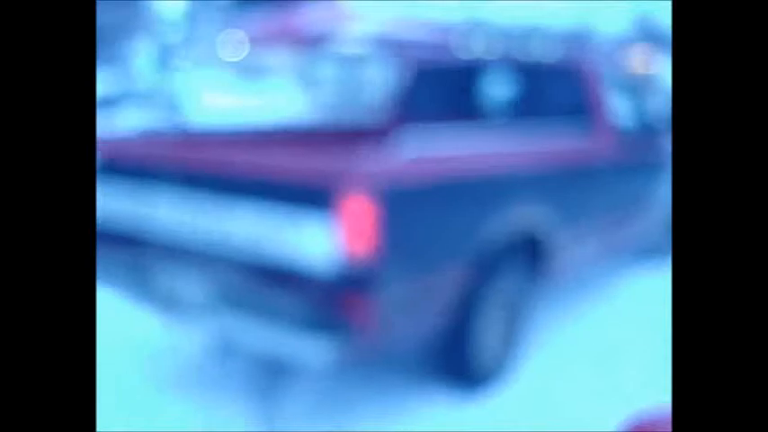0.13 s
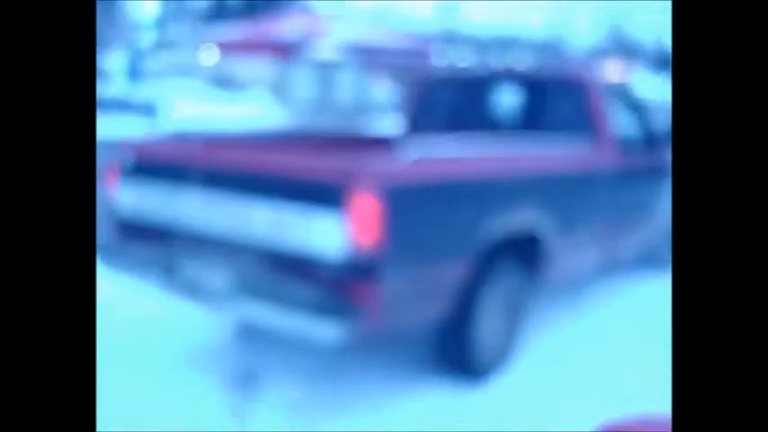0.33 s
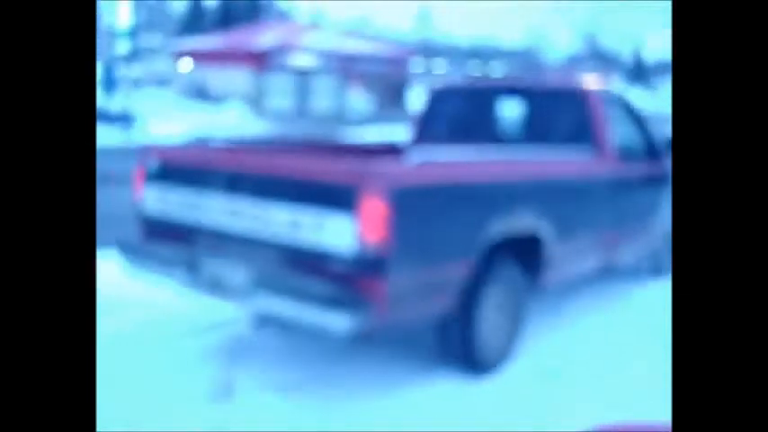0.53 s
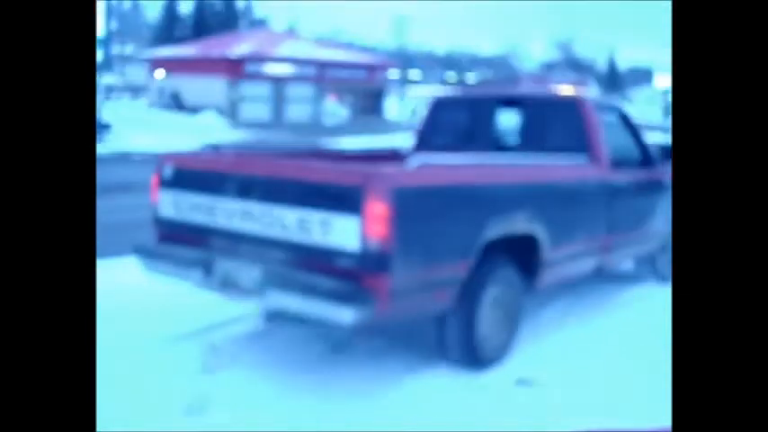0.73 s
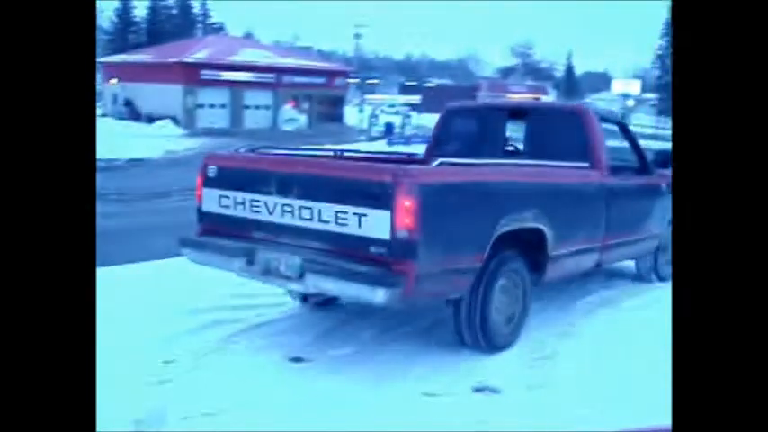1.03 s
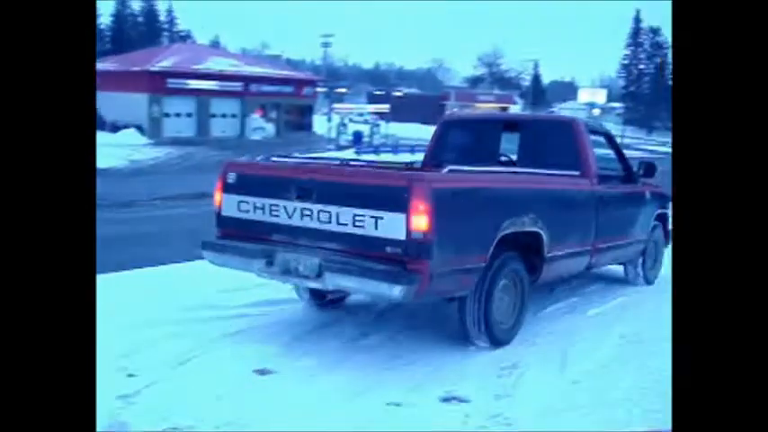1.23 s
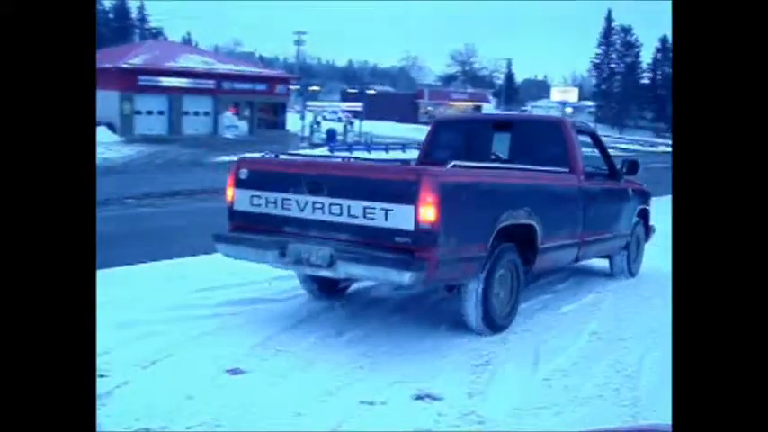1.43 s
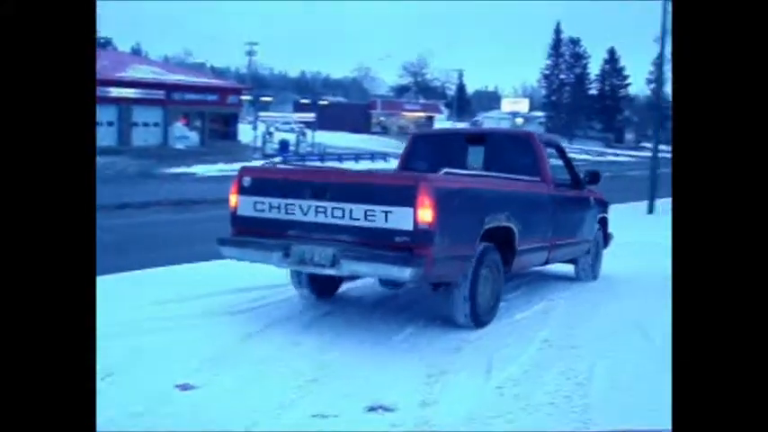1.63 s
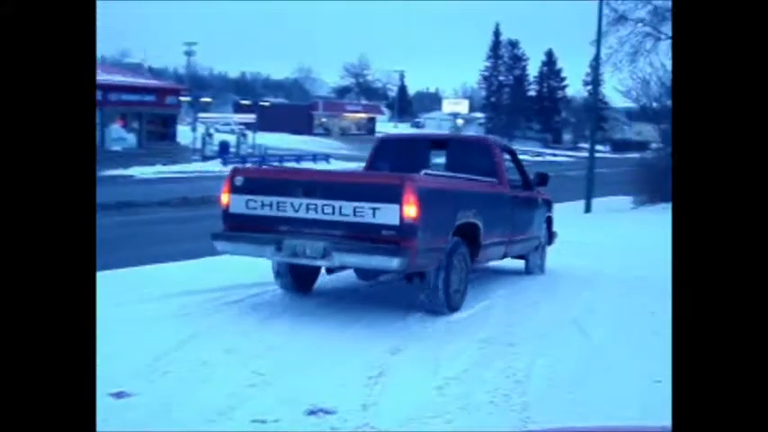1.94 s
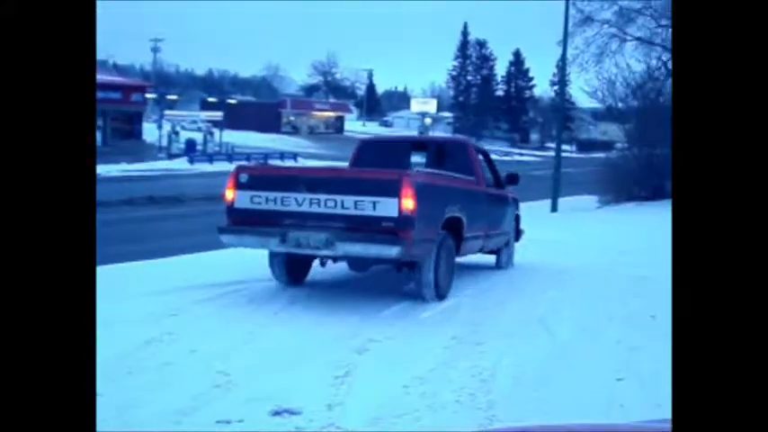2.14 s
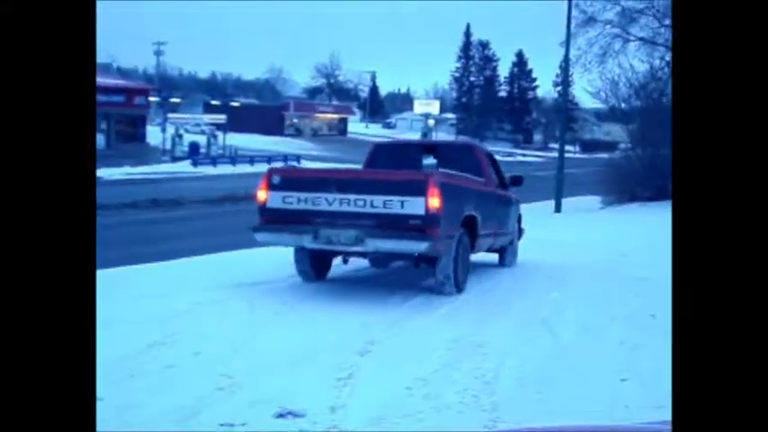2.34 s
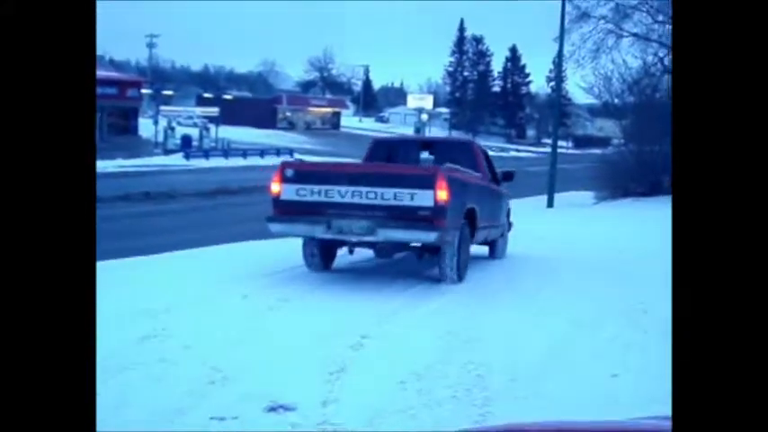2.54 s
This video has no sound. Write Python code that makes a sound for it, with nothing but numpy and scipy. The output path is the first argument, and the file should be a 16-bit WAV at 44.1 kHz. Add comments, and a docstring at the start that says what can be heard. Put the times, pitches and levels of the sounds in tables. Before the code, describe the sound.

A pickup truck's loud exhaust crackles through one sharp rev close by, popping as the engine slows. The truck then pulls away outdoors with a pulsing rumble, hollow knocks and one backfire that briefly overloads the microphone.

```python
"""A crackling blip of a pickup's V8 bursts close by from an open exhaust; the pipes pop as the revs
fall, then the truck pulls away with knocks, a brief metallic ring, rips and one backfire. Each firing
is a pressure pulse that leaves the pipe as a low resonant thump, a hollow bark and a rasp of turbulent
gas. The eight cylinders are unequal, so the sound lopes. The hardest peaks overload the microphone."""
import sys
import numpy as np
from scipy import signal
from scipy.fft import rfft, irfft, next_fast_len
from scipy.io import wavfile
from scipy.ndimage import map_coordinates

SR = 44100
rng = np.random.default_rng(int(sys.argv[2]) if len(sys.argv) > 2 else 0)


def digitize_waveform(pressure):
    """Quantize a signal to 16-bit integers and store it at the path in sys.argv[1].

    Rows of a 2-D input are taken as channels; values are limited to [-1, 1].
    """
    field = np.atleast_2d(pressure).T
    bounded = np.clip(field, -1, 1)
    quanta = np.round(bounded * 32767).astype(np.int16)
    wavfile.write(sys.argv[1], SR, quanta)


N = 119070

# firing rate of the engine: t/s, f/Hz
FIRING_RATE = [(0, 88), (0.2, 103.1), (0.32, 112), (0.44, 103), (0.56, 84), (0.68, 60.8), (0.86, 58.7),
               (1.08, 52.4), (1.3, 47.5), (1.42, 49.3), (1.56, 56.1), (1.8, 60.3), (2.25, 59), (2.7, 56.7)]
# engine load, as relative levels: t/s, bark level/dB, rasp level/dB
ENGINE_LOAD = [(.33, -26.5, -44), (.5, -25.5, -44.5), (.64, -23.5, -44), (.77, -28, -40), (.87, -27, -42),
               (1.0, -30, -51.5), (1.15, -29.5, -41.5), (1.36, -24.5, -34.5), (1.46, -21.5, -29),
               (1.58, -19, -26.5), (1.9, -19.5, -31), (1.98, -25.5, -35), (2.3, -24, -38.5),
               (2.69, -26, -41.5)]
# spectrum of the rushing gas: f/Hz, level/dB
RASP_SPECTRUM = [(700, -34), (1500, -9.5), (2000, -3), (2400, 5.5), (2820, -4.5), (3100, 1), (4400, -3),
                 (5000, -13), (5700, -10), (6800, -13.5), (7600, -19.5), (9000, -26.5), (10200, -38.5)]


def amp(db):
    """Amplitude ratio of a level in decibels."""
    return 10 ** (np.asarray(db) / 20)


def unit(x):
    """Normalisation to rms 1."""
    return x / np.sqrt(np.mean(x ** 2) + 1e-20)


def curve(rows, column=1):
    """Linear interpolation of one column of a timed table, per sample."""
    rows = np.array(rows)
    return np.interp(np.arange(N) / SR, rows[:, 0], rows[:, column])


def coloured(x, spectrum):
    """Minimum-phase filtering: a causal response with the given magnitude (f/Hz, level/dB)."""
    size = 8192
    hz, db = np.transpose(spectrum)
    gain = amp(np.interp(np.log(np.fft.rfftfreq(size, 1 / SR) + 1), np.log(hz), db))
    cepstrum = irfft(np.log(gain))
    cepstrum[1:size // 2] *= 2
    cepstrum[size // 2 + 1:] = 0
    return signal.fftconvolve(x, irfft(np.exp(rfft(cepstrum))))[:N]


def shaped(x, spectrum):
    """Zero-phase filtering: a weighting (f/Hz, level/dB) without delay."""
    hz, db = np.transpose(spectrum)
    f = np.fft.rfftfreq(2 * N, 1 / SR)
    return irfft(rfft(x, 2 * N) * amp(np.interp(np.log(f + 1), np.log(hz), db)))[:N]


def pulses(times, db=0, scatter_db=1.6):
    """Impulse train with normally scattered levels."""
    size = amp(db + scatter_db * rng.standard_normal(len(times)))
    return np.bincount(np.clip(times * SR, 0, N).astype(int), size, N + 1)[:N]


def puffs(spikes, width_s, steady=0):
    """Pulsed turbulence: noise swells and fades around each spike, over a steady flow."""
    half = SR // 50
    shape = 1 / np.cosh(np.arange(-half, half + 1) / SR / width_s)
    flow = signal.fftconvolve(spikes, shape, "same") + steady
    return unit(flow * rng.standard_normal(N))


def exhaust():
    """Periodic excitation: unequal cylinders fire in turn, so the pattern repeats every eight pulses."""
    # in firing order: bank, thump lag/firing intervals, then relative level/dB of thump, bark, rasp
    cylinders = [(0, -0.04, 4.6, 0.5, 9.5), (1, -0.12, 9, -5, 9.5), (0, 0.1, 7, -3.5, 3.5),
                 (1, -0.12, 11, -2.5, 13.5), (1, -0.067, 8.5, 0, 10), (0, 0.016, 9.5, -0.5, 5),
                 (1, -.14, 7.5, -4.5, 5.5), (0, 0.052, 10, -6.5, 4.5)]
    cycles = np.cumsum(curve(FIRING_RATE)) / SR
    firing = np.arange(int(cycles[-1]) + 1)
    jitter_s = 0.00025 * rng.standard_normal(len(firing))
    times = np.interp(firing, cycles, np.arange(N) / SR) + jitter_s
    bank, lag, thump_db, bark_db, rasp_db = np.array(cylinders)[firing % len(cylinders)].T
    thump_times = times + lag * np.gradient(times)
    return thump(thump_times, bank, thump_db) + bark(times, bark_db) + rasp(times, rasp_db) + crackle(times)


def tailpipe(x, modes):
    """Modal superposition: a pipe responds as a sum of damped resonators."""
    size = next_fast_len(N + SR // 2)
    f = np.fft.rfftfreq(size, 1 / SR)
    response = sum(sign * amp(db) * 1j * f * width / (hz * hz - f * f + 1j * f * width)
                   for hz, width, db, sign in modes)
    return irfft(rfft(x, size) * response, size)[:N]


def thump(times, bank, db):
    """Forced resonance: each bank rings its own tailpipe, heard in a deep, an upper and a throb band."""
    # modes of each pipe: f/Hz, bandwidth/Hz, level/dB, polarity
    pipe_modes = [
        [(67, 21, -12, 1), (129, 50, -16, 1), (173, 37, -1, 1), (183, 46, -1, -1), (266, 40, -15, -1)],
        [(88, 46, -10, 1), (177, 39, 0, -1), (191, 49, 0, 1), (221, 23, -2, -1), (296, 22, -15, 1)],
    ]
    # spectra of the three bands: f/Hz, level/dB
    deep_spectrum = [(25, -41.5), (42, -10), (56, 8.5), (82, 5.5), (118, 4), (160, -30), (300, -27)]
    upper_spectrum = [(40, -44), (100, -10.5), (145, 5), (178, -1.5), (220, 0.5), (265, 1.5), (320, 4),
                      (400, 0), (700, -11), (1500, -48.5)]
    throb_spectrum = [(150, -59), (240, -6), (300, 2.5), (350, 10.5), (480, -36.5)]
    # relative strength of the two lower bands: t/s, deep level/dB, upper level/dB
    band_levels = [(.09, -48, -44), (.22, -44.5, -32.5), (.34, -48, -39.5), (.7, -46.5, -34),
                   (1.1, -37.5, -35), (1.4, -32.5, -31), (1.6, -33, -24), (2.2, -30.5, -25.5),
                   (2.69, -29, -23.5)]
    # relative strength of the higher throb: t/s, level/dB
    throb_levels = [(.1, -45), (.6, -38), (.8, -42), (1.05, -38), (1.45, -36.5), (1.75, -48.5),
                    (2.7, -46.5)]
    ring = sum(tailpipe(pulses(times[bank == b], db[bank == b], scatter_db=1), modes)
               for b, modes in enumerate(pipe_modes))
    deep = unit(shaped(ring, deep_spectrum)) * amp(curve(band_levels))
    upper = unit(shaped(ring, upper_spectrum)) * amp(curve(band_levels, column=2))
    throb = unit(shaped(ring, throb_spectrum)) * amp(curve(throb_levels))
    return amp(-2) * (deep + upper + throb)


def bark(times, db):
    """Source and filter: a pressure kick and a puff of gas take on a hollow midrange colour."""
    # spectrum of the bark: f/Hz, level/dB
    spectrum = [(50, -57.5), (250, -3), (450, -11), (580, -3.5), (680, 3), (790, 2.5), (950, -2),
                (1150, -3), (1280, -8.5), (1500, -3.5), (1850, -9), (2600, -22), (5000, -74.5)]
    lead_s = 0.00137
    kicks = pulses(times - lead_s, db)
    gas = 0.42 * unit(kicks) + puffs(kicks, width_s=0.0028, steady=.45)
    return unit(coloured(burbling(gas), spectrum)) * amp(curve(ENGINE_LOAD) - 2.5)


def rasp(times, db):
    """Jet noise: each firing drives out a short, bright puff of turbulent gas."""
    gas = puffs(pulses(times, db), width_s=.0016, steady=.05)
    return unit(coloured(burbling(gas), RASP_SPECTRUM)) * amp(curve(ENGINE_LOAD, column=2) + 3.5)


def crackle(times):
    """Shock noise: a harsh burst follows each firing, loudest while the throttle is blipped."""
    # spectra of the crackle's body and its sharp top: f/Hz, level/dB
    body_spectrum = [(100, -43), (400, -18.5), (600, -11), (790, -0.5), (1150, -9), (1460, 2.5),
                     (1800, -9.5), (2250, 5.5), (2500, -6), (2750, 2), (3250, -7), (3600, -3.5),
                     (4800, -16.5), (7300, -36), (10200, -60.5)]
    spit_spectrum = [(1500, -18.5), (3000, -7.5), (4000, -7), (5200, -0.5), (7300, -10.5), (8600, -12),
                     (10200, -41.5)]
    # strength of the crackle: t/s, level/dB
    blip_levels = [(.08, -15.5), (.12, -17.5), (.175, -14), (.188, -39.5), (.205, -19.5), (.275, -25.5),
                   (.3, -27.5), (.335, -64), (.4, -42)]
    lag_s = .005
    shocks = pulses(times + lag_s)
    body = unit(coloured(puffs(shocks, width_s=0.0045, steady=0.1), body_spectrum))
    spit = unit(coloured(puffs(shocks, width_s=.0011), spit_spectrum))
    return (body + amp(-14.5) * spit) * amp(curve(blip_levels))


def drone():
    """Engine orders: tones locked to the firing rate, slightly unsteady in level."""
    # each tone: multiple of the firing rate, rows of (t/s, level/dB)
    orders = [(1.5, [(.1, -44), (.34, -34.5), (.5, -36), (.62, -59.5)]), (3, [(.6, -51), (.7, -39.5),
              (.9, -41.5), (1.1, -53), (1.55, -47), (1.75, -34.5), (2.4, -34), (2.7, -32.5)])]
    phase = 2 * np.pi * np.cumsum(curve(FIRING_RATE)) / SR
    waver_db = 1.3 * map_coordinates(rng.standard_normal(64), [np.linspace(0, 63, N)])
    return sum(amp(curve(levels) + waver_db) * np.sin(multiple * phase) for multiple, levels in orders)


def echo(x):
    """Diffuse reflection: the truck's body and the road return a weak, short tail."""
    # colour of the reflections: f/Hz, level/dB
    spectrum = [(100, -2), (2500, 4.5), (5000, -4.5), (10000, -48)]
    t60_s, delay_s = 0.072, .003
    t = np.arange(SR // 2) / SR
    tail = rng.standard_normal(len(t)) * amp(-60 * t / t60_s) * (t > delay_s)
    reflected = signal.fftconvolve(x, tail / np.linalg.norm(tail))[:N]
    return amp(-13) * coloured(reflected, spectrum)


def bang(start_s, db, decay_s, spectrum, kick):
    """Blast transient: a pressure impulse with an exponentially decaying burst of gas behind it."""
    t = np.arange(N) / SR - start_s
    burst = rng.standard_normal(N) * (t >= 0) * np.exp(-abs(t) / decay_s)
    burst[int(start_s * SR)] += kick
    sound = coloured(burst, spectrum)
    peak = np.sort(abs(sound))[-8:].mean()
    return amp(db) * sound / peak


def cracks():
    """Brief pulses have broad spectra: the exhaust cracks sharply during the blip."""
    # exhaust cracks: t/s, peak level/dB
    events = [(0.0922, 1.5), (0.118, -0.5), (0.1261, -4), (.154, -4.5), (0.1838, -0.5), (0.206, -6),
              (0.2153, -8.5), (0.2265, 2), (0.235, -9.5), (0.2537, -2.5), (0.263, -6.5), (0.275, -7.5),
              (0.283, -3.5), (0.303, -19), (0.313, -10.5)]
    # spectrum of a crack: f/Hz, level/dB
    spectrum = [(30, -46.5), (600, 11.5), (1400, 11), (2400, 15.5), (3600, 0), (7000, 1.5), (10000, -20.5)]
    return sum(bang(s, db, decay_s=0.0011, spectrum=spectrum, kick=3.5) for s, db in events)


def burbling(gas):
    """Aperiodic flow: under light load a share of the gas leaves in soft puffs at uneven times."""
    # burble while the engine coasts: t/s, share of the power
    coasting = [(.3, 0), (.4, .6), (.75, .8), (1.15, .85), (1.3, .25), (1.45, 0)]
    share = curve(coasting)
    puffs_per_s = 150
    count = int(puffs_per_s * N / SR)
    times = (np.arange(count) + rng.standard_normal(count)) / puffs_per_s
    burble = puffs(pulses(times, scatter_db=2), width_s=.002, steady=.5)
    return np.sqrt(1 - share) * unit(gas) + np.sqrt(share) * burble


def pops():
    """Afterburning: unburnt fuel ignites in the pipe as the revs fall."""
    # ignitions: t/s, peak level/dB, decay time/s
    events = [(.4025, -8, .002), (.421, -11, .003), (.439, -14, .004), (.5985, -12, .0025),
              (.6285, -4.5, .0045), (.6632, -3, .002), (.7178, -12, .003), (1.082, -22, .003),
              (1.141, -20, .003)]
    # spectrum of a pop: f/Hz, level/dB
    spectrum = [(60, -28), (300, -13), (430, -12), (600, -1), (780, 0), (1100, -2), (1600, -6), (2400, -8),
                (3200, -20), (3480, -11), (3750, -22), (6000, -29), (10000, -44)]
    return sum(bang(s, db, decay_s, spectrum, kick=6) for s, db, decay_s in events)


def knocks_and_ring():
    """Damped oscillation: hollow knocks, and a brief metallic ring falling in pitch."""
    # knocks of the pipe and, in the three rows above 1 kHz, the ring: t/s, peak level/dB, f/Hz
    events = [(1.238, -20, 672), (1.299, -16, 760), (1.325, -19, 735), (1.51, -19.5, 1637),
              (1.542, -16.5, 1425), (1.561, -14, 1130), (1.406, -15, 720), (1.463, -9.5, 824),
              (1.558, -15, 803), (1.697, -11.5, 786), (1.747, -12, 856), (1.832, -16, 806),
              (2.014, -22.5, 840), (2.1, -18, 794), (2.148, -16.5, 850), (2.234, -18.5, 770),
              (2.37, -17, 730), (2.507, -30, 716), (2.646, -19, 697)]
    rise_s, decay_s = .0015, 0.0049
    sound = np.zeros(N)
    for start_s, db, hz in events:
        t = np.maximum(np.arange(N) / SR - start_s, 0)
        swell = (1 - np.exp(-t / rise_s)) ** 2 * np.exp(-t / decay_s)
        sound += amp(db) * swell / swell.max() * np.sin(2 * np.pi * hz * t)
    return sound


def rips():
    """Transient jet noise: single dry, bright puffs stand out of the acceleration."""
    # sharpest puffs: t/s, peak level/dB
    events = [(1.611, -9.5), (1.715, -7), (1.749, -5), (1.884, -8.5), (1.903, -14)]
    sound = np.zeros(N)
    for s, db in events:
        spike = pulses(np.array([s]), scatter_db=0)
        puff = coloured(puffs(spike, width_s=0.0007), RASP_SPECTRUM)
        sound += amp(db) * puff / abs(puff).max()
    return sound


def backfire():
    """Pressure wavelet: one hard swing, strong enough to overload the microphone."""
    time_s, centre_hz = 1.9601, 1750
    u = np.pi * centre_hz * (np.arange(N) / SR - time_s)
    return amp(5) * (2 * u ** 2 - 1) * np.exp(-u ** 2)


def scene():
    """Superposition: the truck comes in abruptly, with its echo, over faint outdoor air."""
    start_s, attack_s = .078, 0.0051
    # spectrum of the air: f/Hz, level/dB
    air_spectrum = [(30, -2.5), (200, -20.5), (1000, -6.5), (8000, -82.5)]
    truck = pops() + cracks() + exhaust() + drone() + knocks_and_ring() + rips() + backfire()
    truck *= np.clip((np.arange(N) / SR - start_s) / attack_s, 0, 1)
    air = amp(-91) * unit(coloured(rng.standard_normal(N), air_spectrum))
    return (truck + echo(truck) + air)[None]


def record(dry):
    """Saturation and band limiting: the microphone rounds off the peaks and keeps no top treble."""
    ceiling, hardness, top_hz = 1.02, 5, 10150
    clipped = dry / (1 + abs(dry / ceiling) ** hardness) ** (1 / hardness)
    size = next_fast_len(N + SR // 2)
    passband = np.fft.rfftfreq(size, 1 / SR) < top_hz
    return irfft(rfft(clipped, size) * passband, size)[:, :N]


dry = scene()
out = record(dry)
digitize_waveform(out)
```